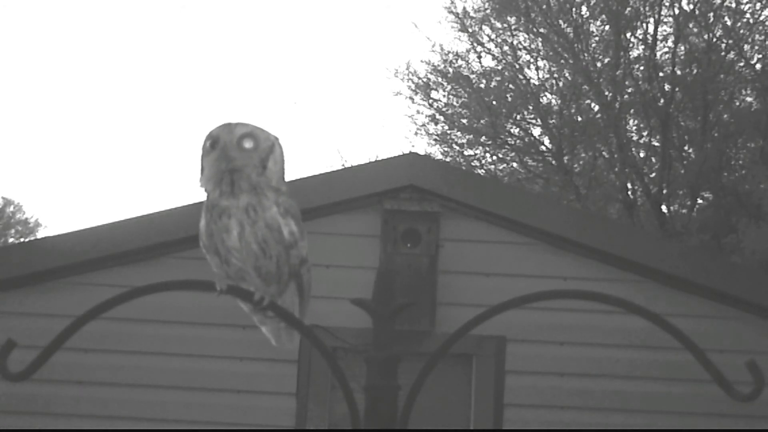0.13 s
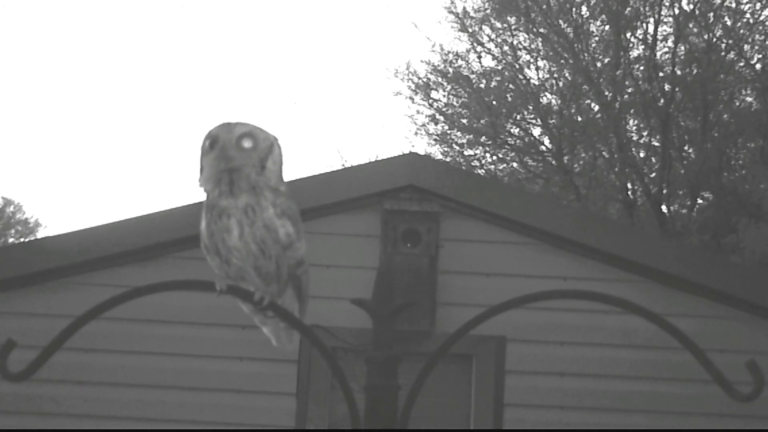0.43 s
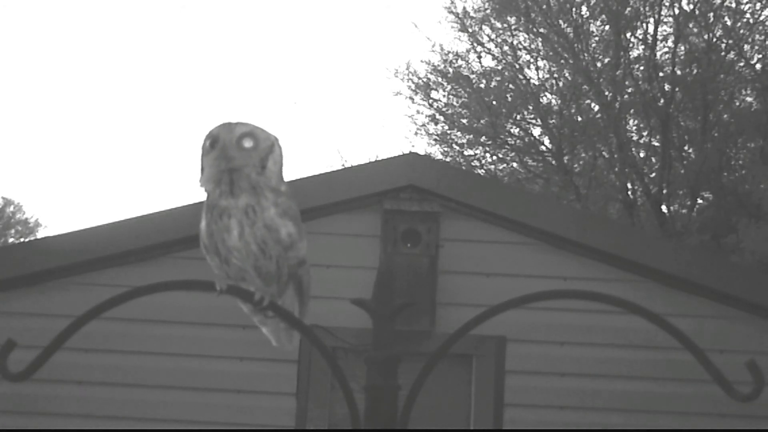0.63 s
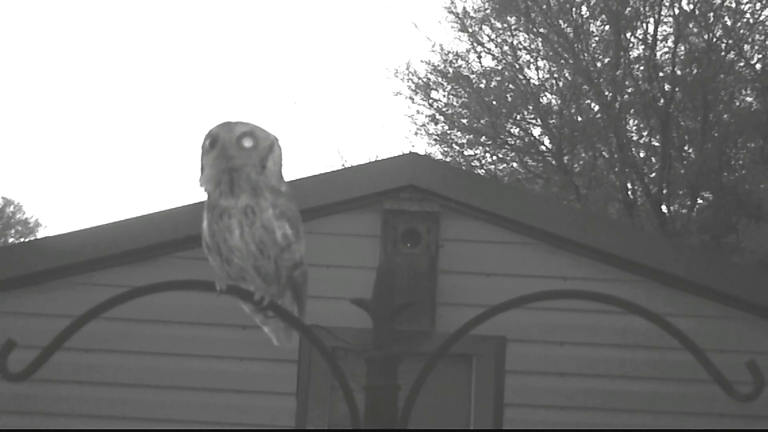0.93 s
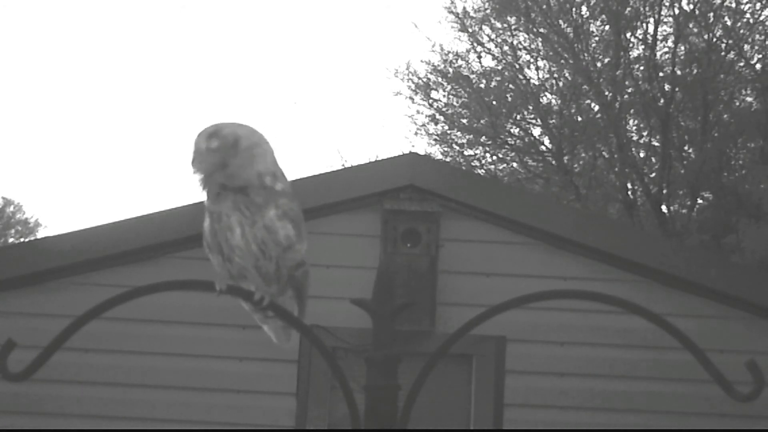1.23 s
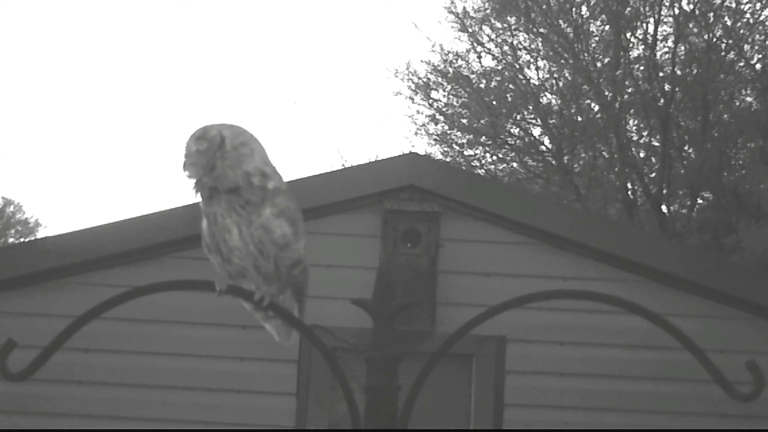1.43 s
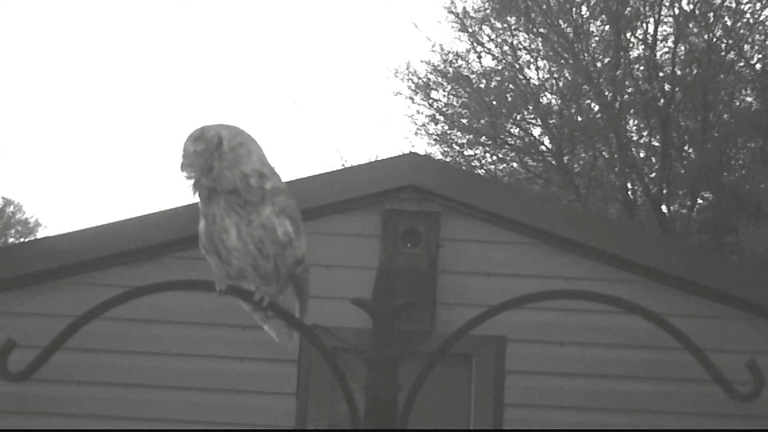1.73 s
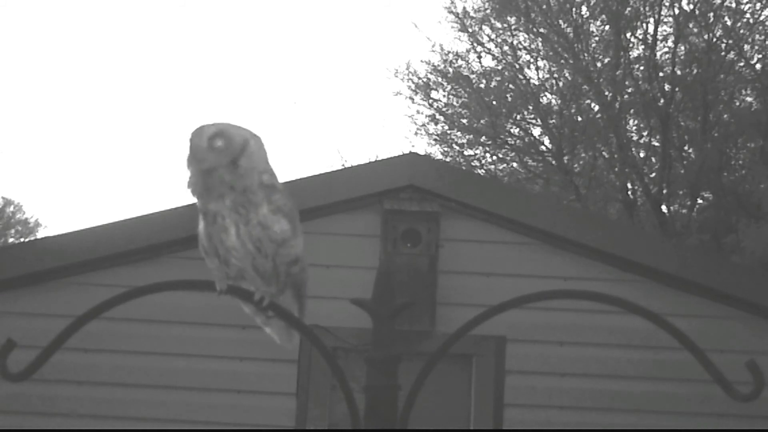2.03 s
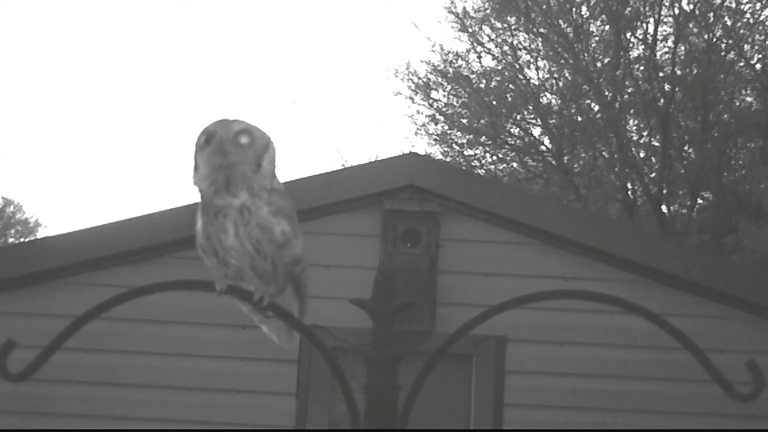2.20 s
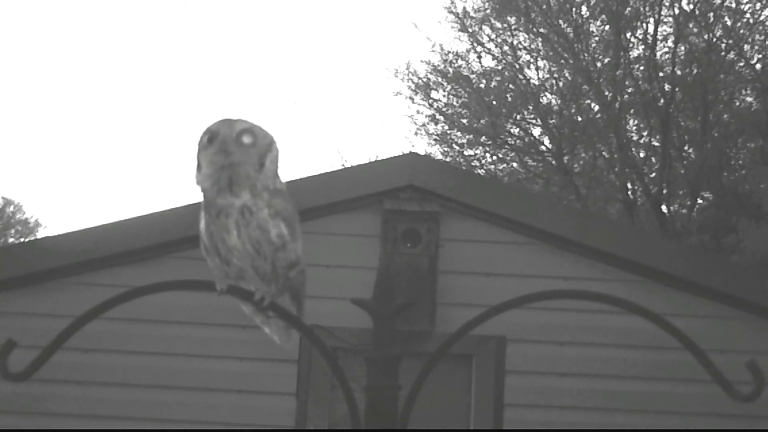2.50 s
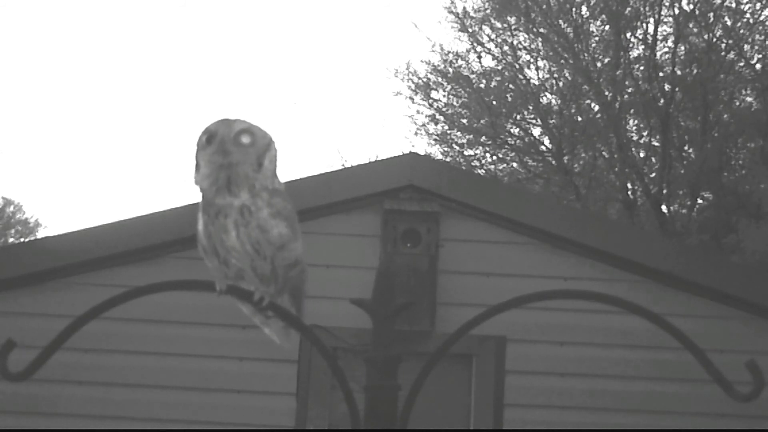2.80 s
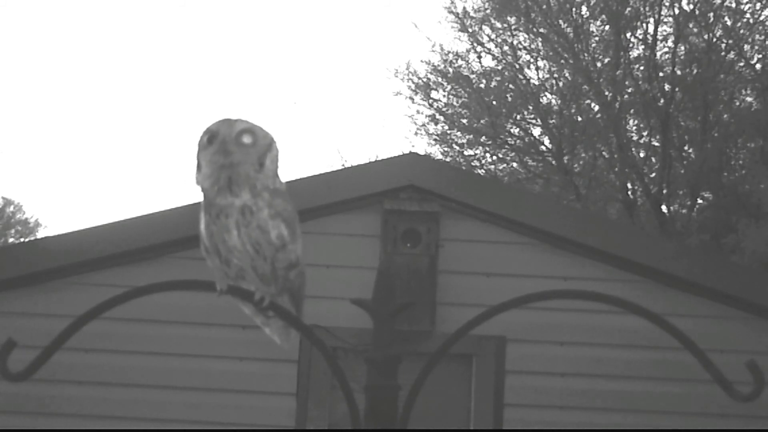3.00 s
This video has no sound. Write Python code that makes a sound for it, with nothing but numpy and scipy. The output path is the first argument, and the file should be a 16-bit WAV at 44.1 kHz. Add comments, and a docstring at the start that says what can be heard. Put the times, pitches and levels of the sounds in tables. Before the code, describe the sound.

Owl trilling softly on one low pitch, about fifteen hoots a second, over faint crickets and rumble

```python
"""A small owl on a garden hook trills at dusk, over far crickets, low rumble, air hiss and a faint whine.
From the start it gives about 15 short, nearly pure hoots a second: sagging sines under arches, with overtones.
Shed wall and trees throw each hoot back as scattered taps. The trill swells slowly; at 1.4-1.9 s the owl
faces aside and its top overtones weaken. Single insect songs, pulsed narrow noise, pass at 0.65 s and
from 2.2 s on. The deepest rumble of the shaped noise is strong at first, and again near 3.05 s."""
import sys
import numpy as np
from scipy import signal
from scipy.fft import rfft, irfft
from scipy.io import wavfile
from scipy.ndimage import uniform_filter1d

SR = 44100
rng = np.random.default_rng(int(sys.argv[2]) if len(sys.argv) > 2 else 0)


def linear_from_db(decibels):
    """Turn decibels (scalar or array-like) into linear amplitude factors; 0 gives 1."""
    return 10 ** (np.asarray(decibels, float) / 20)


def generate_wav(signal):
    """Clip the signal to [-1, 1] and save it as 16-bit WAV at the path in sys.argv[1]."""
    frames = np.transpose(np.atleast_2d(signal))
    scaled = np.clip(frames, -1, 1) * 32767
    pcm = np.round(scaled).astype(np.int16)
    wavfile.write(sys.argv[1], SR, pcm)


N = 138915


def evened(x):
    """Scales to rms 1."""
    return x / np.sqrt(np.mean(x ** 2) + 1e-20)


def add(mix, start_s, sound):
    """Mixes a sound in at start_s, trimmed to the mix."""
    at = round(start_s * SR)
    part = mix[max(at, 0):][:len(sound) + min(at, 0)]
    part += sound[max(-at, 0):][:len(part)]


def resonate(x, hz, width_hz):
    """A steep resonance: shift to zero, smooth by a double pole, shift back."""
    turn = np.exp(2j * np.pi * hz * np.arange(len(x)) / SR)
    r = np.exp(-np.pi * width_hz / SR)
    smooth = signal.lfilter([(1 - r) ** 2], [1, -2 * r, r * r], x / turn)
    return 2 * (turn * smooth).real


def slow(t, top_hz):
    """Slow chance, rms 1: random-phase sines from top_hz / 10 to top_hz."""
    rates_hz = np.geomspace(top_hz / 10, top_hz, 20)
    return evened(sum(np.sin(2 * np.pi * (f * t + rng.random())) / np.sqrt(f) for f in rates_hz))


def electronic_whine():
    """A faint steady sine."""
    peak_db, pitch_hz = -82, 2049
    return linear_from_db(peak_db) * np.sin(2 * np.pi * pitch_hz * np.arange(N) / SR)


# rumble and hiss, with the microphone's steep treble cutoff near 14 kHz, before levelling: freq_hz, density_db
NOISE_SPECTRUM = [(12, -7.5), (29, 3), (45, -4.5), (110, -10), (200, -16.5), (467, -26), (800, -28.5),
                  (1620, -35), (4200, -39.5), (4800, -43), (6000, -47), (13700, -50), (13930, -57),
                  (13980, -80), (22000, -92)]
# deepest rumble, heard relative to RUMBLE_REF_DB: time_s, level_db
RUMBLE_COURSE = [(0.0, -40), (0.06, -47.5), (1.11, -50.5), (1.85, -50), (1.99, -54.5), (2.06, -47),
                 (2.76, -50.5), (2.8, -48), (3.05, -41), (3.15, -47)]
RUMBLE_REF_DB, RUMBLE_CORNER_HZ = -49.5, 47.7
NOISE_RMS_DB = -44.5
PATCHY_RMS_DB, SWELL_RMS_DB, GUST_RMS_DB = 1.1, 0.04, 1.3


def rumble_and_hiss():
    """Town rumble and air hiss: coloured noise with drifting patches; the bass comes in lumps."""
    frames = N // 256 + 5
    hz = np.fft.rfftfreq(1024, 1 / SR)[:, None]
    t = np.arange(frames) * 256 / SR
    real, imag, patches = rng.standard_normal((frames, 513, 3)).T
    patches = evened(uniform_filter1d(uniform_filter1d(patches, 10, 0), 10, 1))
    bass_db = GUST_RMS_DB * slow(t, 5.25) + np.interp(t, *np.transpose(RUMBLE_COURSE)) - RUMBLE_REF_DB
    drift_db = PATCHY_RMS_DB * patches + SWELL_RMS_DB * slow(t, 3.32)
    drift_db = drift_db + bass_db / (1 + (hz / RUMBLE_CORNER_HZ) ** 4)
    noise = signal.istft((real + 1j * imag) * linear_from_db(drift_db), nperseg=1024, noverlap=768)[1][:N]
    freq_hz, density_db = np.transpose(NOISE_SPECTRUM)
    log_hz = np.log(np.fft.rfftfreq(N, 1 / SR) + 1)
    colour = linear_from_db(np.interp(log_hz, np.log(freq_hz + 1), density_db))
    return linear_from_db(NOISE_RMS_DB) * evened(irfft(rfft(noise) * colour, N))


SMEAR = 0.81  # steady share of the noise drive; the rest is pulsed


def wings(hz, width_hz, pulses_hz):
    """Wing strokes ring one narrow mode; distance blurs part of them to noise."""
    strokes = np.cumsum(pulses_hz * (1 + 0.0505 * slow(np.arange(N) / SR, 4))) / SR
    gate = np.maximum(np.sin(2 * np.pi * strokes), 0) ** 2
    drive = ((1 - SMEAR) * evened(gate) + SMEAR) * rng.standard_normal(N)
    return evened(resonate(drive, hz, width_hz))


# steady voices, balance before levelling: pitch_hz, pole_width_hz, level_db, pulses_hz, swell_top_hz, swell_rms_db
CHORUS_VOICES = [(5070, 110, -2, 72, 4, 2.0), (5240, 130, 0, 47, 6, 2.0), (5385, 110, -3, 66, 4, 2.0),
                 (5550, 80, -5, 99, 5, 1.5), (5630, 80, -8, 52, 3, 1.5), (4100, 110, -14, 30, 3, 1.0)]
# whole chorus: time_s, level_db
CHORUS_COURSE = [(0.0, -64), (0.05, -70), (0.07, -66), (0.33, -73), (0.39, -68.5), (1.93, -68), (2.1, -73),
                 (2.34, -68), (2.46, -68.5), (2.95, -69.5), (3.1, -72), (3.15, -69)]
# passing songs: start_s, length_s, pitch_hz, pole_width_hz, level_db (at the middle), pulses_hz
PASSING_SONGS = [(.65, 0.67, 3730, 100, -78.5, 57), (2.393, 0.93, 3725, 108, -72.5, 31),
                 (2.77, 0.16, 2320, 120, -69, 40), (2.92, 0.31, 2450, 200, -70, 40),
                 (2.965, 0.09, 2620, 120, -73, 40), (3.1, .1, 2680, 150, -76, 40),
                 (2.236, .06, 4150, 300, -72, 40)]


def crickets():
    """A far chorus that swells voice by voice, and a few songs that come and go."""
    t = np.arange(N) / SR
    chorus = np.zeros(N)
    for hz, width_hz, level_db, pulses_hz, swell_top_hz, swell_rms_db in CHORUS_VOICES:
        swell = linear_from_db(level_db + swell_rms_db * slow(t, swell_top_hz))
        chorus += swell * wings(hz, width_hz, pulses_hz)
    out = linear_from_db(np.interp(t, *np.transpose(CHORUS_COURSE))) * evened(chorus)
    for start_s, length_s, hz, width_hz, level_db, pulses_hz in PASSING_SONGS:
        arch = np.sqrt(np.sin(np.pi * np.clip((t - start_s) / length_s, 0, 1)) + 1e-9)
        out += linear_from_db(level_db) * arch * wings(hz, width_hz, pulses_hz)
    return out


# near wall, far trees: level_db (re direct), t60_s
YARD_ECHOES = [(-19.5, 0.046), (-22, 0.62)]


def yard(x):
    """Scattered echoes: a short burst from the wall and a thin longer tail from the trees."""
    taps = np.zeros(SR // 2)
    at = np.arange(450, len(taps) - 20, 20)
    for level_db, t60_s in YARD_ECHOES:
        fade = linear_from_db(-60 * at / SR / t60_s)
        signs = rng.choice([-1., 1.], len(at))
        taps[at + rng.integers(0, 20, len(at))] += signs * fade * linear_from_db(level_db) / np.linalg.norm(fade)
    return signal.fftconvolve(x, taps)[:N]


def throat_sac(owl):
    """The throat sac, a two-pole resonance, rings on after each hoot."""
    hz, width_hz, share_db = 605, 51, -13
    turn, r = 2 * np.pi * hz / SR, np.exp(-np.pi * width_hz / SR)
    sac = (1 - r) * signal.lfilter([1, 0, -1], [1, -2 * r * np.cos(turn), r * r], owl)
    return (1 - linear_from_db(share_db)) * owl + linear_from_db(share_db) * sac


# overtones at LOUD_DB: multiple, level_db (re tone), growth_db_per_db of effort,
# arch_exponent (higher is narrower), lost_db (facing away)
HOOT_OVERTONES = [(2, -12, 2.5, 0.98, -1), (3, -33, 1.5, 1.3, -3), (4, -49, 2.2, 1.1, 1),
                  (12, -44, 2.2, .7, 8), (13, -41.5, 4.5, 0.94, 8), (14, -49, 2.2, 0.76, 8)]
# head turned aside: start_s, end_s
FACING_AWAY = (1.4, 1.9)
LOUD_DB = -37  # reference effort
HOOT_S, SKEW = 0.0405, 0.97
ROUND, ROUND_PER_DB = 0.94, -0.12  # arch exponent; louder hoots hold a flatter top
SAG_HZ_PER_S, SAG_HZ_PER_S_PER_DB = 1200, -90  # sags less when loud
SCOOP_HZ, SCOOP_S = 45, 0.0045  # starts low and scoops up quickly
WAVER_HZ = 22  # before smoothing
OVERTONE_RISE_DB, OVERTONE_CHANCE_DB = 5, 1.2  # gain over the hoot; spread between hoots
OVERTONE_SILL = 0.3  # overtones sound above this share of the arch
BREATHY_GAIN_DB, BREATHY_HZ, BREATHY_WIDTH_HZ = -5.5, 785, 100  # on noise thinned by its resonance


def hoot(middle_s, level_db, pitch_hz):
    """One puff through the syrinx: a sagging sine under an arch; overtones grow with effort."""
    t = np.arange(0, HOOT_S, 1 / SR)
    effort_db = level_db - LOUD_DB
    arch = np.sin(np.pi * (t / HOOT_S) ** SKEW) ** (ROUND + ROUND_PER_DB * effort_db)
    waver = uniform_filter1d(rng.standard_normal(4000), 200)[:len(t)]
    sag = (SAG_HZ_PER_S + SAG_HZ_PER_S_PER_DB * effort_db) * (t - HOOT_S / 2)
    glide_hz = pitch_hz - sag - SCOOP_HZ * np.exp(-t / SCOOP_S) + WAVER_HZ * waver
    phase = 2 * np.pi * (np.cumsum(glide_hz) / SR + rng.random())
    away = FACING_AWAY[0] < middle_s < FACING_AWAY[1]
    tone = linear_from_db(level_db) * arch * np.cos(phase)
    above_sill = np.maximum((arch - OVERTONE_SILL) / (1 - OVERTONE_SILL), 0)
    for multiple, under_db, growth, arch_exponent, lost_db in HOOT_OVERTONES:
        over_db = LOUD_DB + under_db + growth * effort_db - away * lost_db
        over_db += OVERTONE_CHANCE_DB * rng.standard_normal()
        rise_db = OVERTONE_RISE_DB * (t / HOOT_S - 0.5)
        tone += linear_from_db(over_db + rise_db) * above_sill ** arch_exponent * np.cos(multiple * phase)
    breath = resonate(rng.standard_normal(4000), BREATHY_HZ, BREATHY_WIDTH_HZ)[-len(t):]
    tone += linear_from_db(level_db + BREATHY_GAIN_DB) * arch * breath
    return middle_s - HOOT_S / 2, np.sqrt(2) * tone


# the trill, ahead of the throat sac: middle_s, level_db (rms at the arch's top), pitch_hz
TRILL_HOOTS = [(0.017, -43, 605), (0.0831, -43.5, 611), (0.1495, -42, 603), (0.2161, -42.5, 611),
               (0.2823, -42.5, 606), (0.3468, -42, 609), (0.4137, -40.5, 609), (0.4796, -41.5, 609),
               (0.5458, -40.5, 613), (0.6103, -40.5, 609.9), (0.6767, -40, 611), (0.7432, -40, 609.5),
               (0.8082, -39.5, 607), (0.8729, -39, 617), (0.9393, -39.5, 612), (1.0054, -38.5, 609.5),
               (1.0697, -38, 611), (1.135, -38.5, 609.8), (1.2002, -38.5, 613), (1.2667, -38, 607),
               (1.3323, -38.5, 615), (1.3965, -38.5, 608.6), (1.4618, -39, 607), (1.527, -38.0, 608.4),
               (1.5919, -38.5, 608), (1.658, -38.5, 607), (1.7218, -38.5, 605), (1.7873, -37.5, 605),
               (1.8529, -38, 606.7), (1.9172, -37.5, 610), (1.9825, -37.5, 604), (2.0473, -37.5, 608),
               (2.1115, -37, 607), (2.1761, -36, 609), (2.2412, -37, 600), (2.3054, -36, 602.0),
               (2.3706, -36.5, 597.4), (2.4355, -36.5, 598), (2.5002, -36, 600.2), (2.565, -36.5, 597),
               (2.6304, -36, 598.1), (2.6928, -36, 597.9), (2.7587, -36.5, 601), (2.8229, -36, 595),
               (2.8874, -36, 600), (2.9524, -36.5, 597), (3.0152, -36.0, 594.5), (3.0815, -36, 595.6),
               (3.1465, -36.5, 600)]


def owl_trill():
    """The row of hoots, coloured by the throat sac."""
    owl = np.zeros(N)
    for row in TRILL_HOOTS:
        add(owl, *hoot(*row))
    return throat_sac(owl)


def scene():
    """Owl, echoes, insects, rumble and hiss."""
    owl = owl_trill()
    return (owl + yard(owl) + crickets() + rumble_and_hiss())[None]


def roll_off(x):
    """The treble ends steeply here."""
    return signal.sosfilt(signal.butter(12, 14920, fs=SR, output="sos"), x)


def record(dry):
    """A faint electronic whine joins in the camera."""
    mix = dry + electronic_whine()
    return roll_off(mix)


dry = scene()
out = record(dry)
generate_wav(out)
```